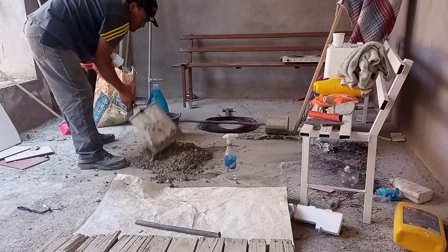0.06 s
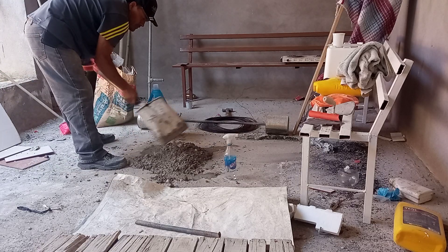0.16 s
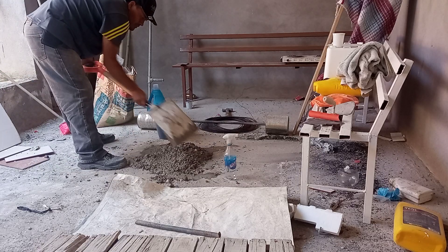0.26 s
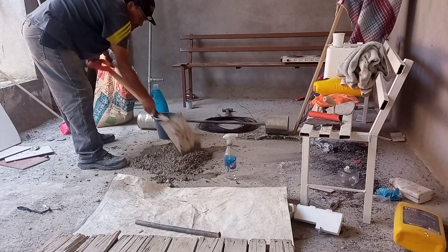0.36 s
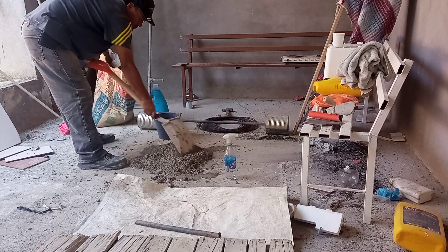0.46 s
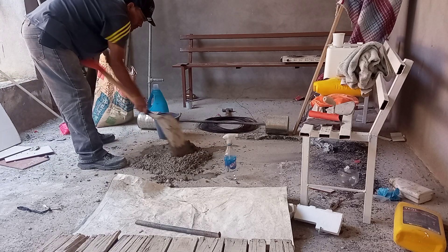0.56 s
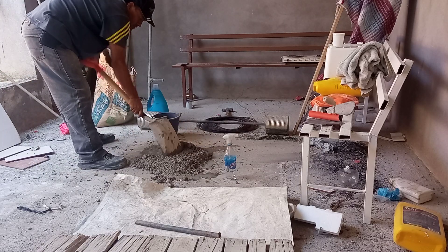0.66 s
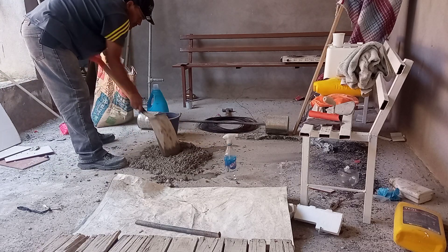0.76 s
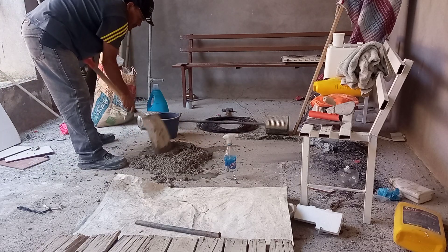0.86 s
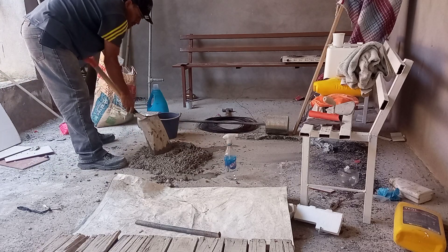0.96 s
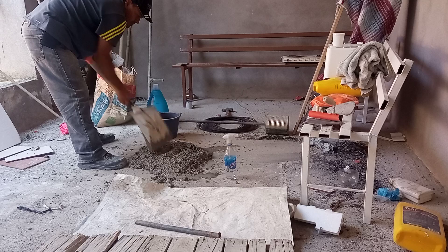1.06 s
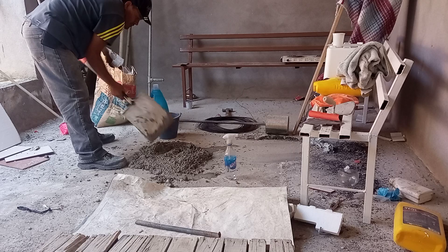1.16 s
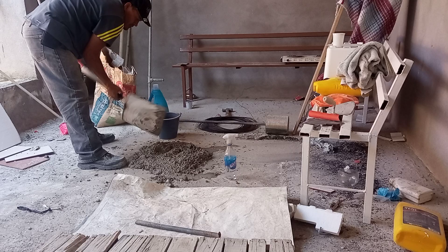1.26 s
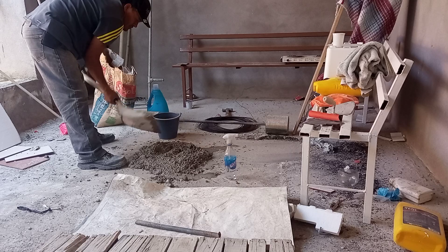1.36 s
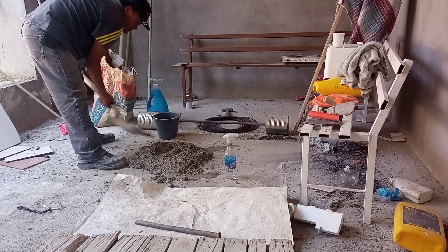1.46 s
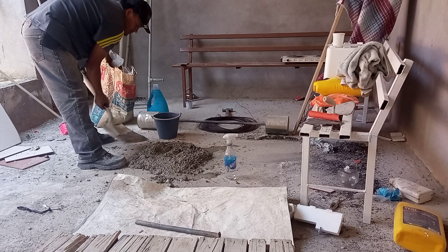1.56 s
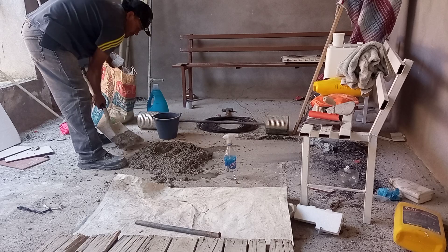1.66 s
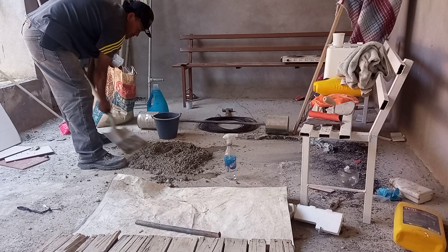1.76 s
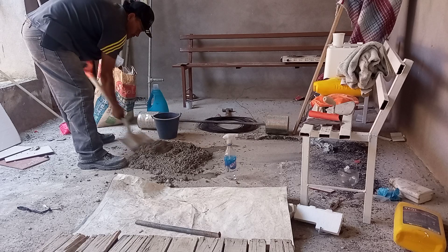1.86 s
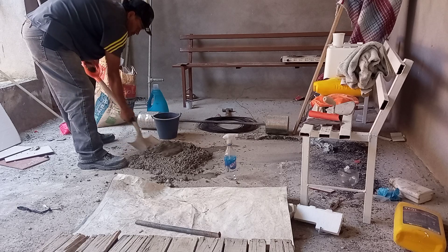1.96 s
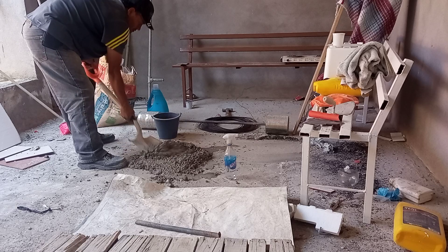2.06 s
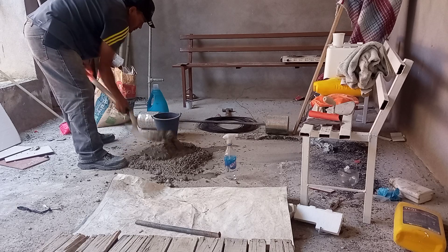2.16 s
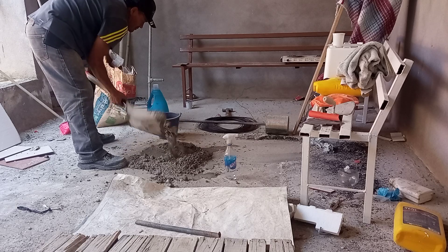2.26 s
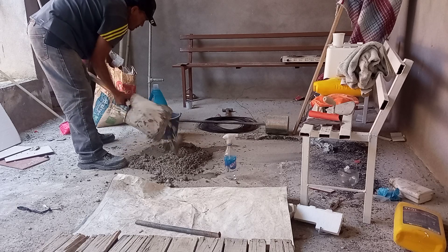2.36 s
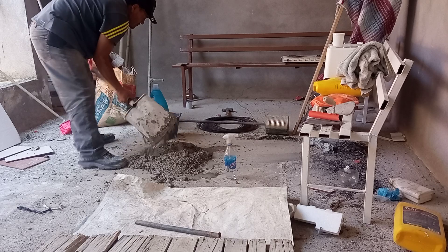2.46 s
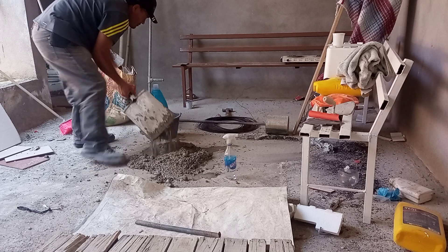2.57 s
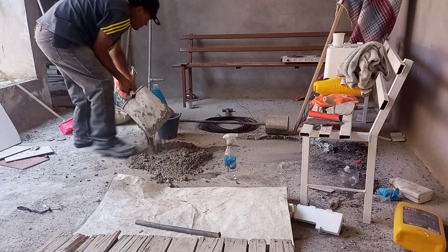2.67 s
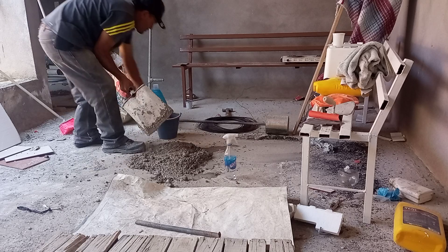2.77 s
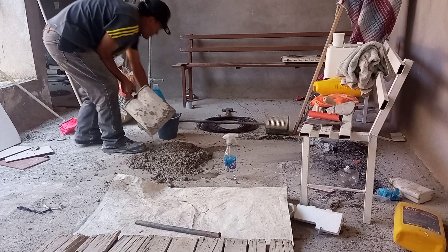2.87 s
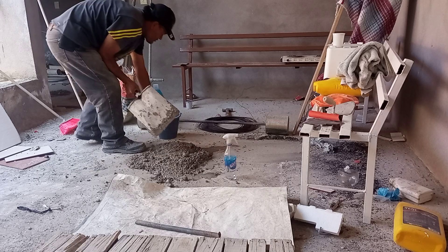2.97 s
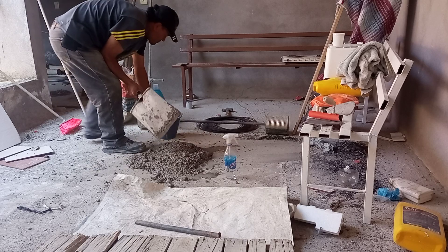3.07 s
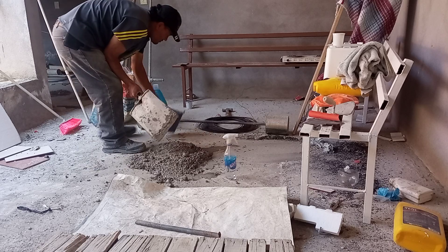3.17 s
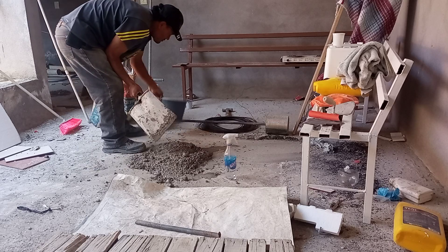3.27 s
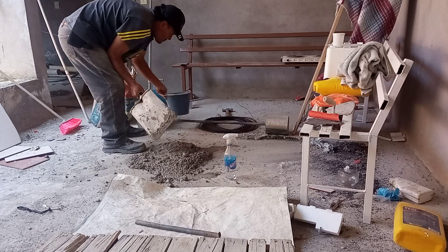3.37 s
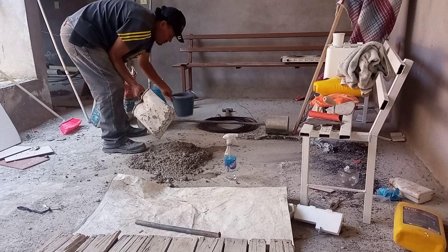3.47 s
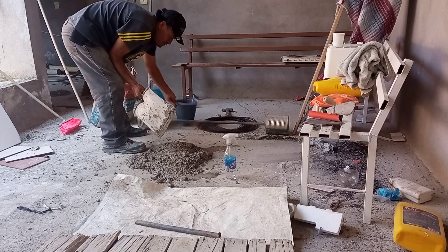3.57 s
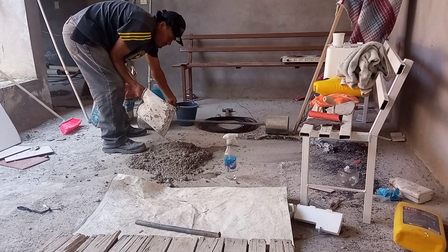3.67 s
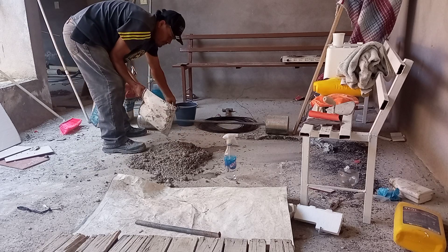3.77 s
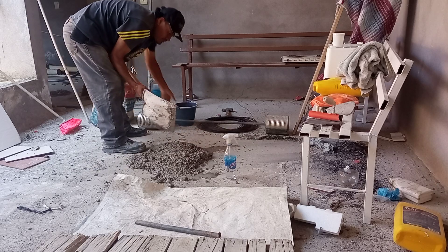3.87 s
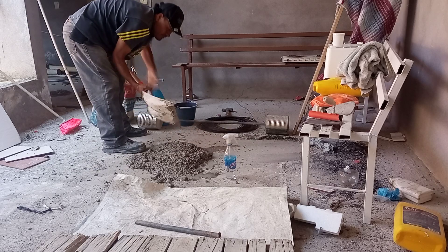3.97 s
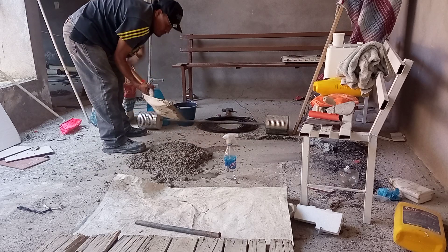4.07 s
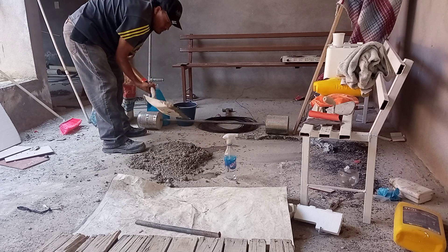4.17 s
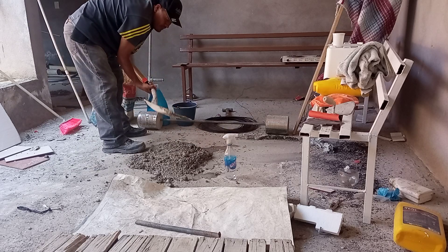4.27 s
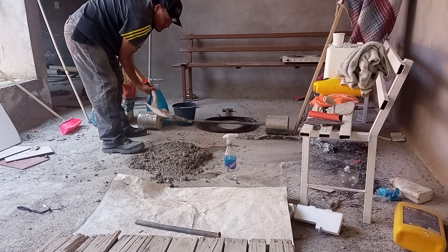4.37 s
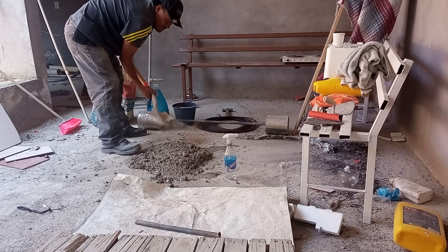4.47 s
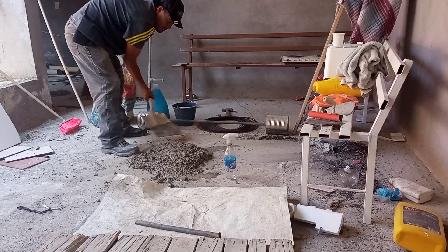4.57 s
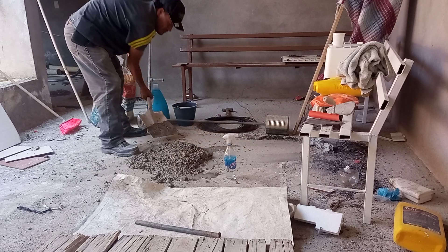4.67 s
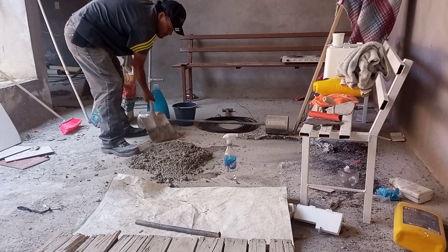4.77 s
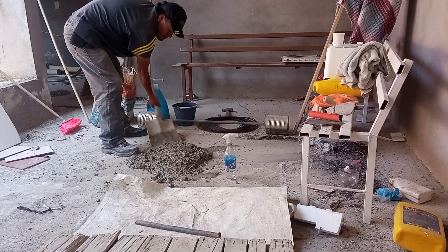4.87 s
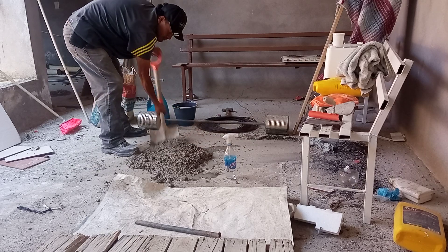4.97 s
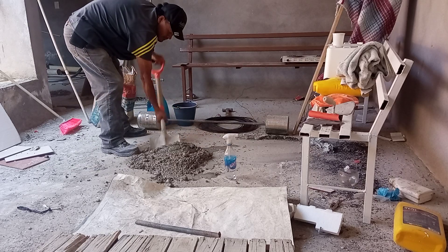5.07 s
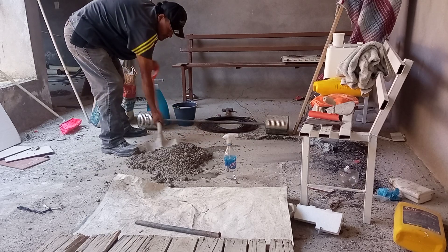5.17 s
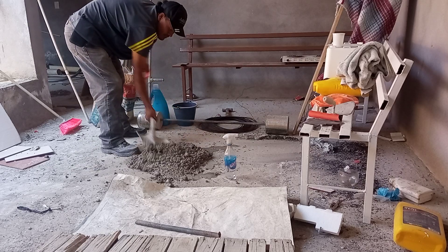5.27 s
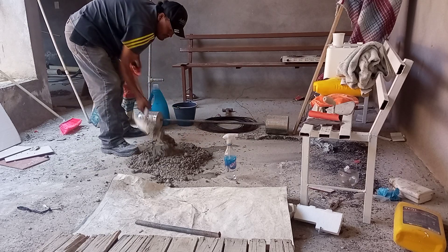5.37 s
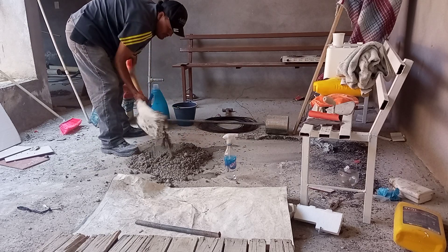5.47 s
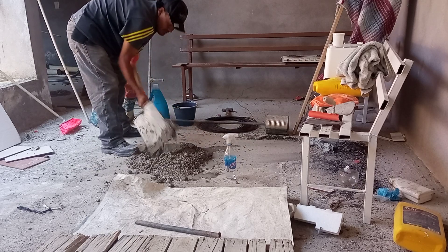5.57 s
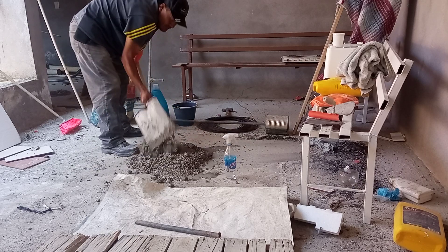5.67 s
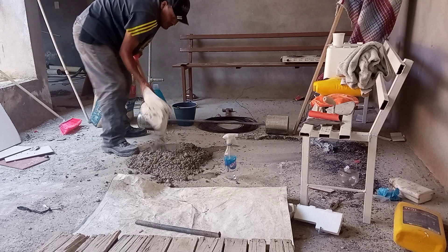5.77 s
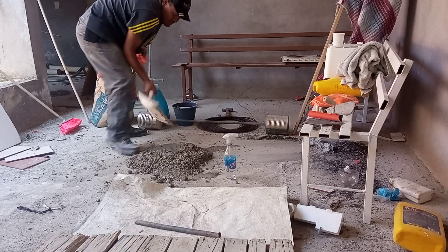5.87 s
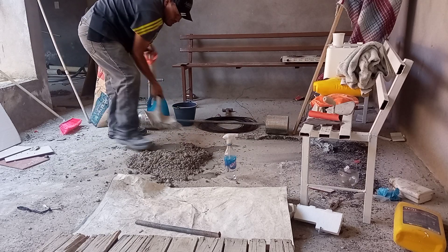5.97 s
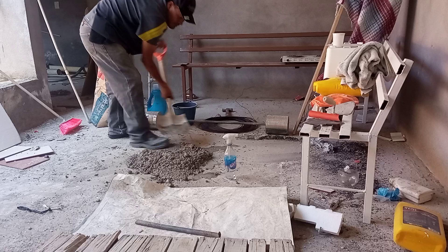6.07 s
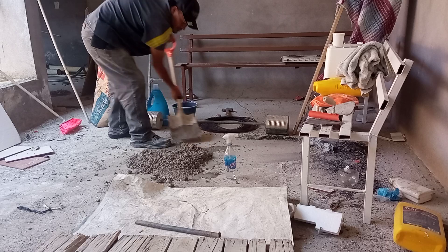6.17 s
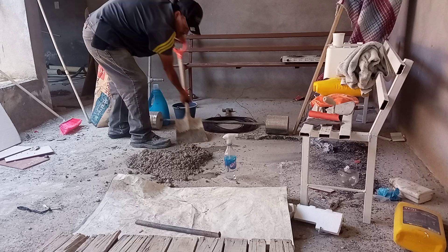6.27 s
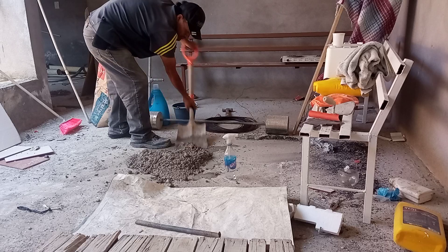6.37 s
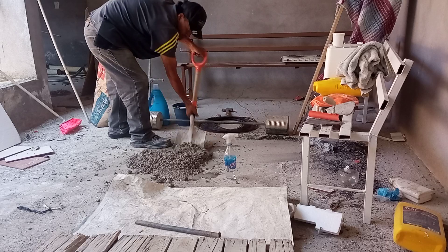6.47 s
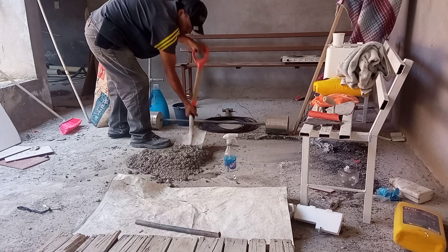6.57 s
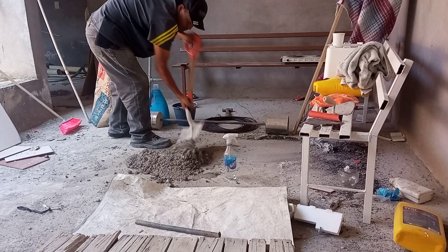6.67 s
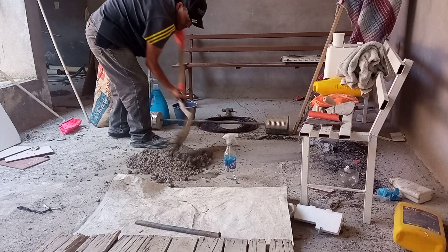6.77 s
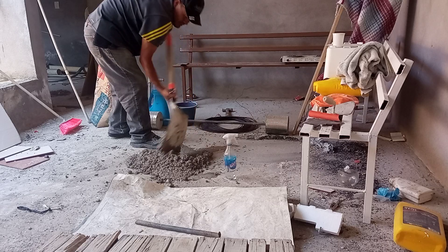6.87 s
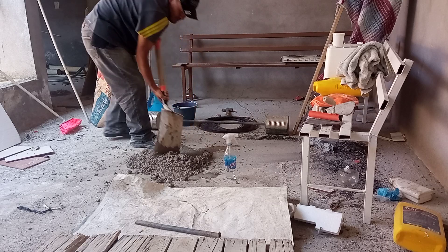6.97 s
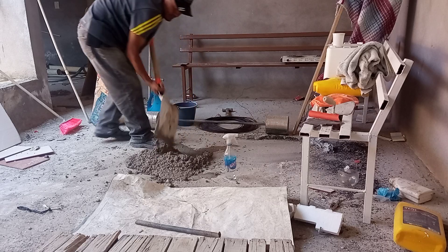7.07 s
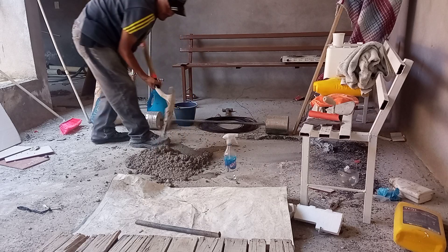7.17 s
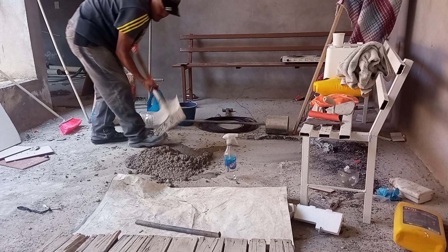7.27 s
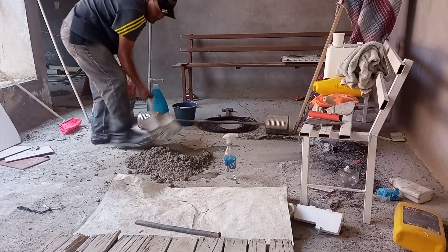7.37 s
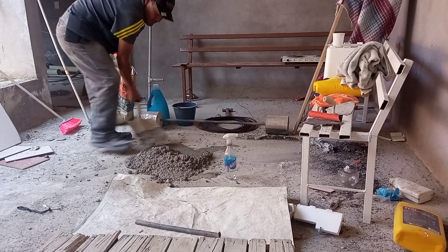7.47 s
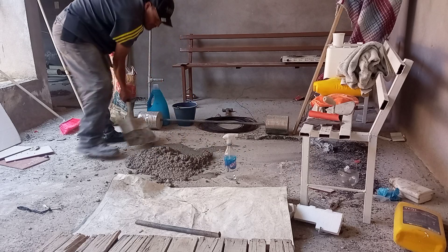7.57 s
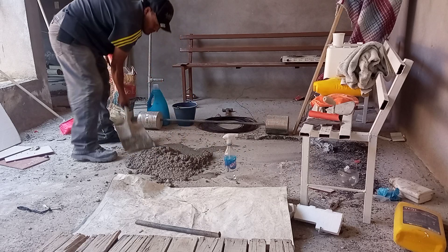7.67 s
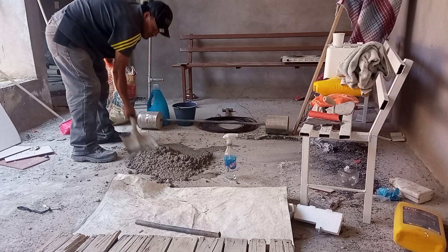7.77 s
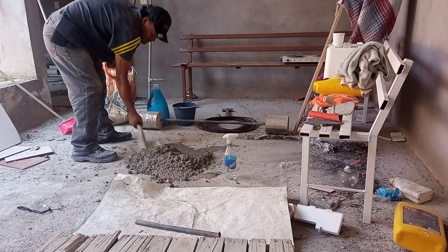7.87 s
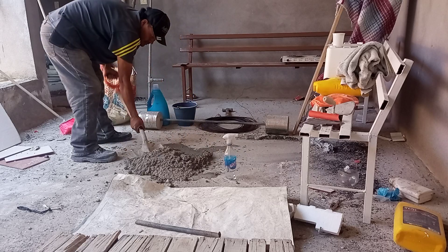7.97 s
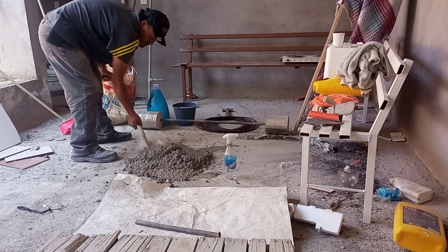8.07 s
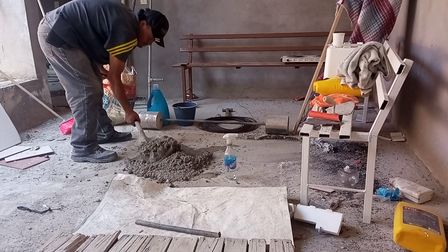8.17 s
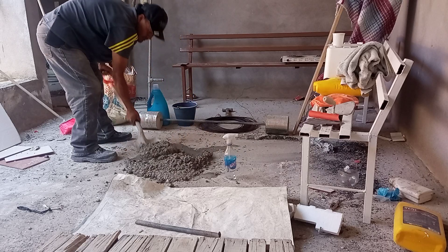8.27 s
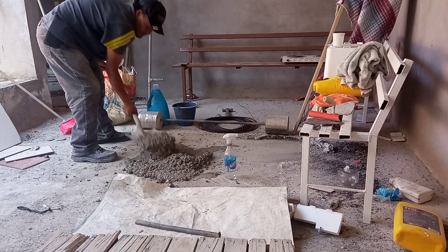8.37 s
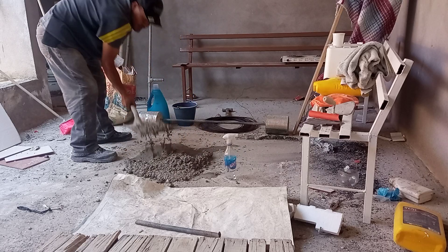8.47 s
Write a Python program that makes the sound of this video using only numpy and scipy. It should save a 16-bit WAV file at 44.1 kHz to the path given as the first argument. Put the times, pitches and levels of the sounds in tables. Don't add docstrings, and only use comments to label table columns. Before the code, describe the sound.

A steel shovel chops and scrapes through damp sand and gravel on a concrete floor, mix trickling down between strokes in a bare, echoing room.

```python
import sys
import numpy as np
from scipy import signal
from scipy.io import wavfile
from scipy.ndimage import uniform_filter1d

SR = 44100
rng = np.random.default_rng(int(sys.argv[2]) if len(sys.argv) > 2 else 0)


def volts_from_db(level):
    exponent = np.asarray(level, float) / 20
    return 10 ** exponent


def persist_wave(psi):
    counts = np.round(np.clip(psi, -1, 1) * 32767).astype(np.int16)
    wavfile.write(sys.argv[1], SR, np.atleast_2d(counts).T)


N = 375728


def evened(x):
    return x / np.sqrt(np.mean(x ** 2) + 1e-20)


def read(points, hz):
    f, value = np.transpose(points)
    return np.interp(np.log(hz + 1), np.log(f + 1), value)


def add(mix, s, sound):
    part = mix[round(s * SR):][:len(sound)]
    part += sound[:len(part)]


def split(x, hz):
    low = signal.sosfilt(signal.butter(2, hz, fs=SR, output="sos"), x)
    high = signal.sosfilt(signal.butter(2, hz, "high", fs=SR, output="sos"), x)
    return low, high


# (frequency [Hz], level [dB per Hz])
HUSH_COLOUR = [(25, -30), (45, -14.5), (62, -2), (80, 5.5), (130, 4.5), (300, -7.5), (700, -11.5),
               (1600, -17), (3900, -13.5), (6400, -25.5), (9800, -25), (12300, -33), (16000, -44.5)]


def hush():
    frames, hz = N // 256 + 5, np.fft.rfftfreq(1024, 1 / SR)
    a, b, patches = rng.standard_normal((frames, 513, 3)).T
    patches = uniform_filter1d(patches, size=8, axis=0)
    patches = evened(uniform_filter1d(patches, size=24, axis=1))
    patchy_db = 1.8 * patches
    spectrum = (a + 1j * b) * volts_from_db(read(HUSH_COLOUR, hz)[:, None] + patchy_db)
    air = signal.istft(spectrum, nperseg=1024, noverlap=768)[1][:N]
    return volts_from_db(-74) * evened(air)


# (time [s], level [dB])
ENGINE_SURGES = [(.21, -73), (.7, -79), (1.15, -76), (1.49, -59), (1.95, -66.5), (2.95, -77), (3.35, -79),
                 (3.72, -69), (4.06, -55), (4.9, -68), (5.4, -70.5), (5.72, -68.5), (6.2, -64),
                 (6.53, -66.5), (6.98, -62), (7.15, -61), (7.35, -60), (7.85, -72), (8.05, -70),
                 (8.399, -77)]


def rumble():
    surge_s, idle_db = 0.043, -87
    t = np.arange(0, N + 100, 100) / SR
    level = volts_from_db(idle_db) + sum(volts_from_db(db) * np.exp(-((t - s) / surge_s) ** 2) for s, db in ENGINE_SURGES)
    band = signal.butter(2, [52, 74], "band", fs=SR, output="sos")
    drone = signal.sosfilt(band, rng.standard_normal(N))
    return volts_from_db(-6) * np.interp(np.arange(N) / SR, t, level) * evened(drone)


# (frequency [Hz], width [Hz], level over the plain grit [dB])
BLADE_MODES = [(647, 140, 8.5), (830, 59, 12.5), (1033, 47, 13), (1620, 160, 6), (2110, 120, 5.5),
               (3300, 840, 2), (6340, 190, 2), (9630, 80, 10.5)]


def body(colour, ring):
    hz = abs(np.fft.fftfreq(4096, 1 / SR))
    peaks_db = sum(db / (1 + (2 * (hz - f) / w) ** 2) for f, w, db in BLADE_MODES)
    log_gain = np.log(volts_from_db(np.maximum(read(colour, hz), -100) + ring * peaks_db))
    minimum_phase = np.exp(np.conj(signal.hilbert(log_gain)))
    return np.fft.ifft(minimum_phase).real[:2048]


def contact(rows, colour, ring, per_s, spread_db, judder_db):
    longest = 26000
    s, *columns = np.transpose(rows)
    t = np.arange(s[0], s[-1], 1 / SR)[:longest]
    level_db, bass_db, treble_db = (np.interp(t, s, c) for c in columns)
    chance, size, sign = rng.random((longest, 3))[:len(t)].T
    grain_gain = volts_from_db(spread_db * np.minimum(-np.log(size + 1e-9), 5))
    grains = (chance < per_s / SR) * np.sign(sign - .5) * grain_gain
    judder = uniform_filter1d(rng.standard_normal(longest), size=250)
    judder = evened(uniform_filter1d(judder, size=250))[:len(t)]
    rubbed = signal.oaconvolve(grains, body(colour, ring))[:len(t)]
    low, rest = split(rubbed, 500)
    mid, high = split(rest, 3000)
    mixed = evened(mid) - volts_from_db(bass_db) * evened(low) - volts_from_db(treble_db) * evened(high)
    fades = np.clip(np.minimum((t - s[0]) / .005, (s[-1] - t) / .03), 0, 1)
    return s[0], volts_from_db(level_db + judder_db * judder) * mixed * fades


def rub(row, kind):
    s, rise, fall, db, tone_db = row
    start_db, end_db, bass_db, treble_db, dying_db = kind
    low_db, high_db = bass_db - 0.58 * tone_db, treble_db + tone_db
    return [(s, db - start_db, low_db, high_db),
            (s + rise, db, low_db, high_db),
            (s + rise + fall, db - end_db, low_db, high_db + dying_db)]


def rubs(rows, kind, colour, **grain):
    out = np.zeros(N)
    for row in rows:
        add(out, *contact(rub(row, kind), colour, **grain))
    return out


# (frequency [Hz], level [dB per Hz])
SHOE_SWELLS = [(1.1, 0.058, .08, -76, -17), (1.35, 0.14, 0.15, -85.5, 10),
               (1.559, 0.013, 0.049, -81.5, 19.5), (2.77, 0.033, 0.13, -49, -6),
               (3.0, 0.024, 0.23, -67.5, 5), (3.2, 0.071, 0.072, -77, -19), (3.34, 0.0064, .1, -50.5, -2),
               (3.48, .015, 0.049, -60, 2.5), (3.602, 0.024, 0.017, -67.5, -2),
               (4.699, 0.024, .08, -74.5, -3.5), (6.125, 0.031, 0.073, -51, -2.5),
               (6.199, 0.066, .04, -62.5, -5), (7.3, .06, 0.026, -78, -13), (7.41, 0.012, .06, -81, 19.5),
               (7.509, 0.018, 0.089, -88.5, 24.5), (7.619, .06, .06, -88.5, -13.5)]
SHOE_RUB = (3, 28, 1, 0, -2.5)
SHOE_COLOUR = [(29, -22.5), (50, -8), (198, 3.5), (408, -9), (630, -8), (863, -12), (1400, -5), (1580, -13),
               (6240, -17), (9640, -26), (13500, -49.5), (16000, -36.5)]


def shuffles():
    return rubs(SHOE_SWELLS, SHOE_RUB, SHOE_COLOUR, ring=.1, per_s=7700, spread_db=1.0, judder_db=2.0)


# (frequency [Hz], level [dB per Hz])
PAIL_TAPS = [
    (4.394, .008, .08, -52.5, 0.0094),
    (4.444, 0.0035, 0.039, -39, 0.011),
    (4.46, .015, 0.17, -54, 0.01),
]
PAIL_RUB = (3, 22.5, -10.5, -19.5, 16)
PAIL_COLOUR = [(100, -29), (250, -11.5), (640, -7.5), (900, -13), (1500, -19), (2200, -30), (6500, -30.5),
               (14000, -49.5)]


def taps():
    return rubs(PAIL_TAPS, PAIL_RUB, PAIL_COLOUR, ring=.2, per_s=10000, spread_db=4.5, judder_db=-3.2)


MIX_SETTLES = [
    (.47, .01, 0.39, -51, 3),
    (.76, .01, 0.19, -53.5, 4),
    (1.0, .01, 0.15, -56.5, 2),
    (2.08, 0.028, 0.41, -48.5, -0.5),
    (5.2, 0.038, 0.44, -46.5, -2.5),
    (6.62, 0.047, 0.33, -44.5, -1.5),
    (7.0, 0.011, 0.084, -57, 18.5),
    (8.02, 0.031, 0.42, -45.5, -5),
]
SETTLING_RUB = (6.5, 16, -3, -15, 8.5)
MIX_SPILLS = [
    (0.0, 0.0013, 0.21, -48.5, -5.5),
    (.03, 0.06, 0.26, -48, -1),
    (2.36, 0.27, 0.34, -48, 1.5),
    (5.56, .16, 0.23, -44.5, -1.5),
    (5.85, 0.064, 0.22, -64, 8.5),
    (7.06, 0.092, 0.26, -48.5, -12),
    (8.2, 0.097, 0.27, -62, -1),
]
SPILLING_RUB = (12.5, 30.5, -14.5, -1.5, 13)
# (frequency [Hz], level [dB per Hz])
SPILL_COLOUR = [(30, -49.5), (60, -32), (120, -7), (220, -8.5), (450, -9), (600, -3), (3000, -2.5),
                (4000, -3.5), (6400, 1), (8000, -6.5), (9600, -4), (13500, -21), (16000, -17)]


def spills():
    settled = rubs(MIX_SETTLES, SETTLING_RUB, SPILL_COLOUR, ring=.45, per_s=10000, spread_db=3.5, judder_db=3.5)
    spilled = rubs(MIX_SPILLS, SPILLING_RUB, SPILL_COLOUR, ring=.11, per_s=10000, spread_db=3.5, judder_db=3.5)
    return settled + spilled


# (time [s], peak level [dB], pitch [Hz])
STRUCK_STONES = [(0.403, -19, 1210), (0.685, -20, 501.7), (0.92, -26.5, 614), (1.564, -52, 6990),
                 (1.797, -34, 867), (3.352, -43, 1200), (3.487, -61, 1310), (4.306, -62, 900),
                 (4.447, -38, 751), (4.708, -45.5, 1360), (4.853, -17.5, 977), (4.925, -11.5, 1040),
                 (4.967, -18, 856), (5.019, -16.5, 627), (5.119, -31, 689), (6.333, -20, 816),
                 (6.39, -15.5, 818), (6.422, -15.5, 1050), (6.942, -16.5, 1820), (6.942, -30, 3300),
                 (7.516, -50, 6790), (7.595, -47, 4400), (7.745, -22, 1100), (7.822, -7.5, 549)]


def stones():
    out, t = np.zeros(N), np.arange(900) / SR
    for s, db, hz in STRUCK_STONES:
        cracks = (rng.random(len(t)) < 900 / SR) * rng.standard_normal(len(t)) * volts_from_db(-60 * t / 0.024)
        cracks[0] = 0.53
        crack = signal.lfilter(*signal.iirpeak(hz, .8, SR), cracks) + 0.018 * cracks
        add(out, s, volts_from_db(db + 0.5) * crack / abs(crack).max())
    return out


# (frequency [Hz], level [dB], t60 [s])
HANDLE_MODES = [(188.4, -43.5, .06), (301, -24, 0.062), (445, -7, .14), (474.3, 5, 0.047),
                (551, 5.5, 0.023), (814, -7.5, 0.052), (920, -19, .04), (1254, -14, 0.049),
                (1600, -18, .05), (2050, -29, 0.025), (2480, -15.5, 0.026), (3140, -19.5, 0.023),
                (3440, -20.5, 0.046)]
# (frequency [Hz], level [dB per Hz])
RATTLE_COLOUR = [(350, -28), (600, -7.5), (1130, -22), (1610, -9), (1830, -16), (3480, -27), (3990, -32),
                 (6550, -31), (16000, -57.5)]


def knock():
    knock_s, ring_db, rattle_db = 3.6675, -11.5, -24
    out, t = np.zeros(N), np.arange(SR) / SR
    ring = sum(volts_from_db(db - 60 * t / t60) * np.sin(2 * np.pi * hz * t) for hz, db, t60 in HANDLE_MODES)
    noise = rng.standard_normal(len(t))
    rattle = evened(signal.oaconvolve(noise, body(RATTLE_COLOUR, 0))[:len(t)])
    add(out, knock_s, volts_from_db(ring_db) * ring * (1 - np.exp(-t / 0.0015)))
    add(out, knock_s, volts_from_db(rattle_db - 60 * t / 0.065) * rattle * (1 - np.exp(-t / 0.0013)))
    return out


CHOP_SWELLS = [
    (.4, 0.013, 0.059, -38, 0.5),
    (.684, 0.0036, 0.091, -38, -2.5),
    (.92, 0.019, 0.052, -37.5, 2.5),
]
CHOPPING_RUB = (21, 19.5, -0.5, -1, -16.5)
EDGE_SLIDES = [
    (0.375, 0.014, 0.023, -53, 8.5),
    (.64, .043, .03, -54, 10),
    (.86, 0.031, .03, -50.5, 2.5),
    (1.101, 0.046, .15, -72.5, 3),
]
SLIDING_RUB = (16, 11, -23.5, 2.5, 3.5)
# (frequency [Hz], level [dB per Hz])
CHOP_COLOUR = [(30, -36.5), (60, -19), (230, -3.5), (450, 2.5), (800, -10.5), (1250, -10), (2200, -11),
               (4500, -18.5), (6400, -21), (9400, -24), (13500, -41), (16000, -45)]


def chops():
    grain = dict(ring=0.1, per_s=9000, spread_db=2, judder_db=5.0)
    chopped = rubs(CHOP_SWELLS, CHOPPING_RUB, CHOP_COLOUR, **grain)
    return chopped + rubs(EDGE_SLIDES, SLIDING_RUB, CHOP_COLOUR, **grain)


EDGE_CLIPS = [
    (6.935, 0.0037, 0.049, -35, 2.4),
    (7.16, 0.013, 0.045, -63, 0),
]
CLIPPING_RUB = (16, 24.5, -3, 2, -3)
# (frequency [Hz], level [dB per Hz])
SCRAPE_COLOUR = [(30, -53), (60, -32.5), (190, -8), (280, -11), (700, -8), (1360, -9.5), (2270, -8),
                 (4670, -13), (6400, -9), (8000, -17), (9400, -16.5), (13500, -36.5), (16000, -35.5)]


def clips():
    return rubs(EDGE_CLIPS, CLIPPING_RUB, SCRAPE_COLOUR, ring=0.17, per_s=8000, spread_db=4.0, judder_db=3.0)


# (share of stroke [0-1], level [dB])
LOAD_BASS = [(0, -3), (.5, -1.5), (1, 9.5)]
# (share of stroke [0-1], level [dB])
EDGE_TREBLE = [(0, 2.5), (.5, -3.5), (1, -4)]


def stroke(pressure, weight_db):
    s, db = np.transpose(pressure)
    share = (s - s[0]) / (s[-1] - s[0])
    bass_db = weight_db + np.interp(share, *np.transpose(LOAD_BASS))
    treble_db = np.interp(share, *np.transpose(EDGE_TREBLE))
    return np.transpose([s, db, bass_db, treble_db])


def resonate(x, hz, width):
    turn = np.exp(2j * np.pi * np.cumsum(hz) / SR)
    r = np.exp(-np.pi * width / SR)
    return 2 * (turn * signal.lfilter([1 - r], [1, -r], x / turn)).real


# (lowest [Hz], highest [Hz])
CLUMP_RANGE = (698, 2440)


def clumps(sound, width, share):
    clump_s = .03
    lowest, highest = CLUMP_RANGE
    pitch = lowest * (highest / lowest) ** rng.random(100) ** 1.43
    hz = pitch[np.minimum(np.arange(len(sound)) / (clump_s * SR), 99).astype(int)]
    return share * resonate(sound, uniform_filter1d(hz, size=200), width)


# (time [s], level [dB])
SCRAPE_PRESSURE = [
    [(1.795, -34.5), (1.811, -38), (1.851, -33), (1.891, -28.5), (1.977, -29.5), (2.08, -51)],
    [(4.848, -45), (4.858, -37.5), (4.91, -46.5), (4.928, -30.5), (5.042, -22.5), (5.08, -28), (5.2, -39)],
    [(6.322, -30), (6.334, -34.5), (6.366, -39), (6.454, -24), (6.524, -27), (6.62, -41)],
    [(7.742, -53), (7.756, -31.5), (7.832, -26), (7.87, -26.5), (8.02, -36.5)],
]
# (empty [Hz], full load [share of stroke], loaded [Hz], weight as bass [dB])
BELLY_RING = [
    (940, .7, 330, -6),
    (900, .65, 1700, -6),
    (790, 0.79, 1750, -9.5),
    (1020, 0.48, 620, -7.5),
]


def scrapes():
    out = np.zeros(N)
    for pressure, (empty, full, loaded, weight_db) in zip(SCRAPE_PRESSURE, BELLY_RING):
        rows = stroke(pressure, weight_db)
        s, sound = contact(rows, SCRAPE_COLOUR, ring=0.57, per_s=10000, spread_db=3.5, judder_db=1.45)
        share = np.arange(len(sound)) / len(sound)
        eased = loaded + .55 * (empty - loaded)
        hz = np.interp(share, [0, 0.56 * full, full, 1], [empty, empty, loaded, eased])
        belly = resonate(sound, hz, width=560)
        add(out, s, 0.77 * sound + 0.72 * belly + clumps(sound, width=170, share=0.55))
    return out


# (frequency [Hz], t60 [s])
WALL_DECAY = [(100, 1.7), (260, 0.96), (700, 0.75), (1840, 0.75), (4850, 0.63), (12800, 0.34)]


def diffuse(linger):
    pulses = np.zeros(2 * SR)
    at = np.arange(200, 2 * SR - 10, 10)
    pulses[at + rng.integers(0, 10, len(at))] = rng.choice([-1., 1.], len(at))
    hz, t, z = signal.stft(pulses, SR, nperseg=256)
    t60 = np.maximum(linger * read(WALL_DECAY, hz), .05)[:, None]
    tail = signal.istft(z * volts_from_db(-60 * t / t60), SR, nperseg=256)[1]
    return tail / np.linalg.norm(tail)


# (delay [s], level [dB])
EARLY_ECHOES = [(.0045, -12), (.0095, 0), (0.0149, 0.5), (0.023, -8), (.028, -12.5), (.039, -2), (0.08, -9),
                (.117, -26)]


def room(x, echo_db, tail_db, linger):
    out = x.copy()
    for s, db in EARLY_ECHOES:
        add(out, s, volts_from_db(db + echo_db) * x)
    low = signal.sosfiltfilt(signal.butter(2, 800, fs=SR, output="sos"), x)
    slow = 2 * np.pi * 6 * np.arange(N) / SR
    for _ in range(2):
        quick = np.cumsum(uniform_filter1d(rng.standard_normal(N), size=40)) * .2
        for wave in (np.cos, np.sin):
            feed = wave(slow) * low + wave(quick) * (x - low)
            out += volts_from_db(tail_db - 3) * signal.oaconvolve(feed, diffuse(linger))[:N]
    return out


def scene():
    grit = volts_from_db(-4) * (shuffles() + taps() + spills() + chops() + clips() + scrapes())
    low_down = room(grit + stones(), echo_db=-6.5, tail_db=1.5, linger=0.8)
    lifted = room(knock(), echo_db=-4.0, tail_db=2.5, linger=1.196)
    return (volts_from_db(-6) * (low_down + lifted) + hush() + rumble())[None]


def top_cut(x):
    return signal.sosfilt(signal.butter(12, 16660, fs=SR, output="sos"), x)


# (frequency [Hz], level [dB a bin])
SUPPRESSOR_GATE = [(60, -112), (500, -104), (1500, -102), (4000, -106), (12000, -116)]
# (frequency [Hz], gain [dB])
MICROPHONE_COLOUR = [(13800, 0), (14700, 13), (15700, 5.5), (15950, -11.5), (16600, -59)]


def record(dry):
    thin = signal.sosfilt(signal.butter(4, 60, "high", fs=SR, output="sos"), dry)
    hz, t, z = signal.stft(thin, SR, nperseg=512, noverlap=384)
    power = uniform_filter1d(abs(z) ** 2, size=6, axis=2)
    power = uniform_filter1d(power, size=5, axis=1)
    threshold = volts_from_db(read(SUPPRESSOR_GATE, hz))[:, None] ** 2
    keep = np.maximum(1 - threshold / (abs(power) + 1e-20), .1)
    colour = volts_from_db(read(MICROPHONE_COLOUR, hz))[:, None]
    finished = signal.istft(z * keep * colour, SR, nperseg=512, noverlap=384)[1][:, :N]
    return top_cut(finished)


dry = scene()
out = record(dry)
persist_wave(out)
```